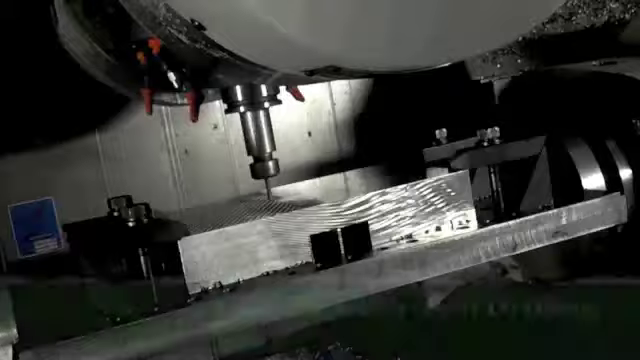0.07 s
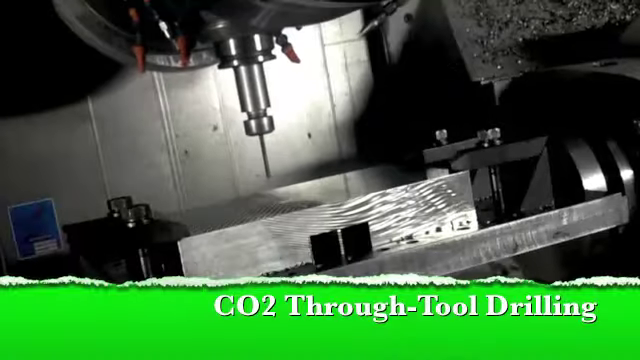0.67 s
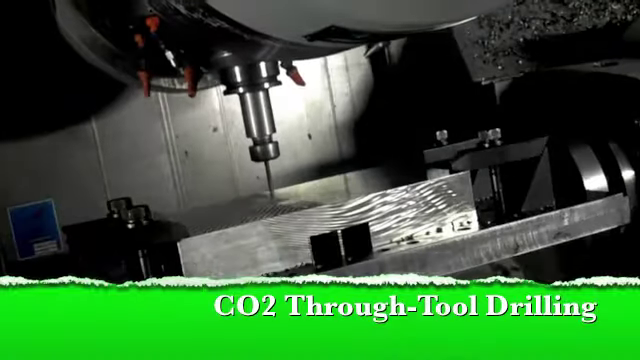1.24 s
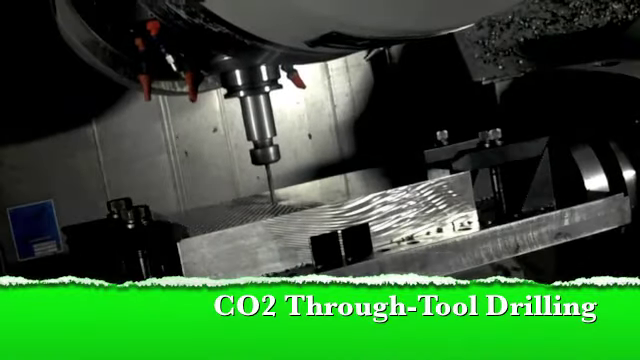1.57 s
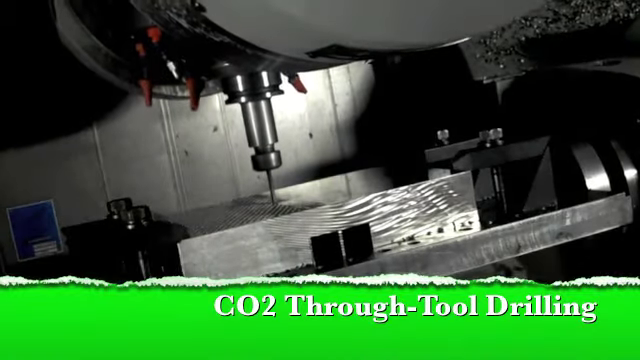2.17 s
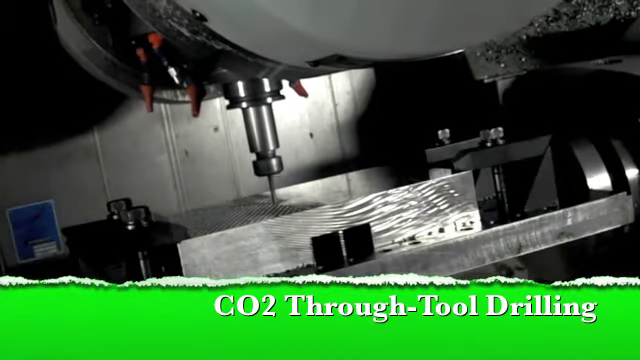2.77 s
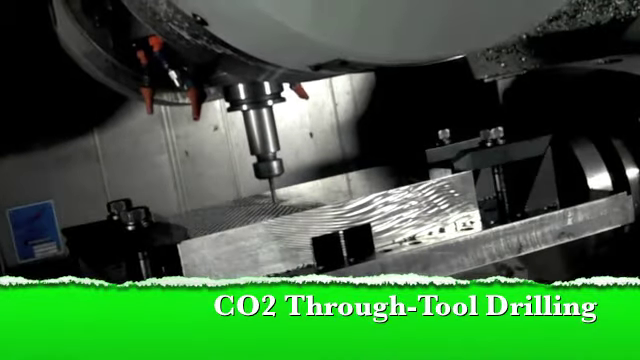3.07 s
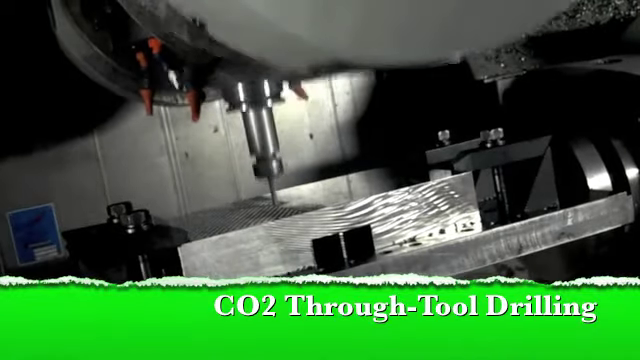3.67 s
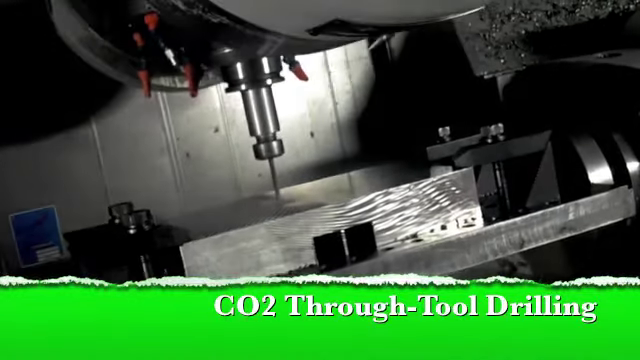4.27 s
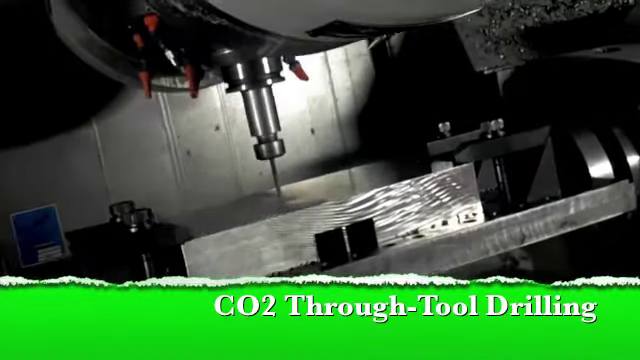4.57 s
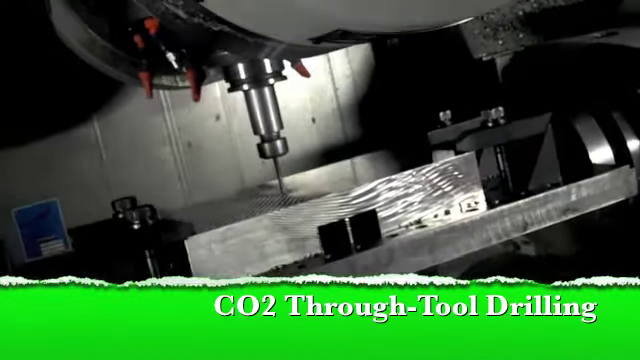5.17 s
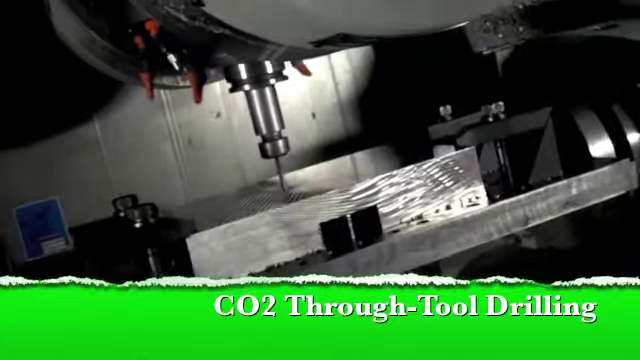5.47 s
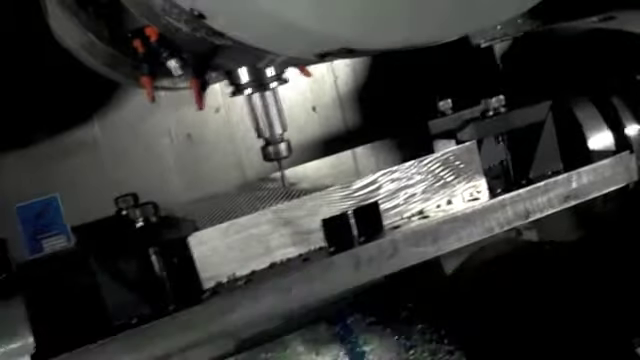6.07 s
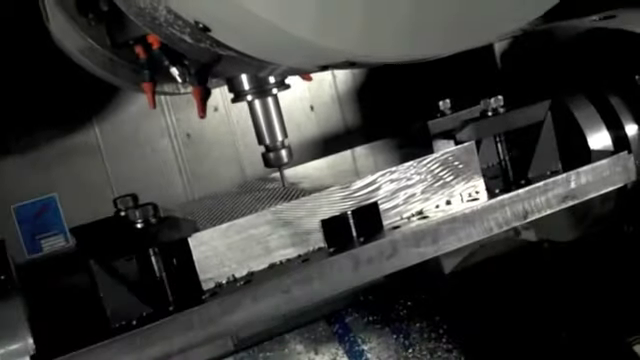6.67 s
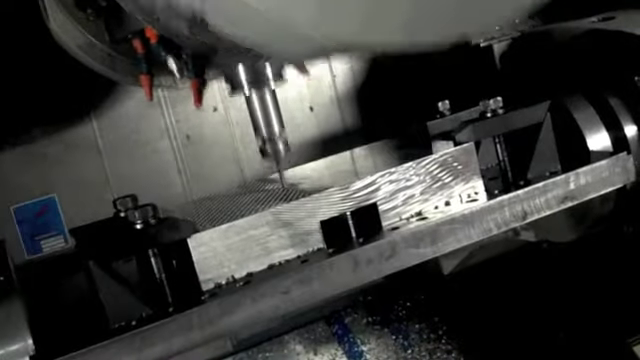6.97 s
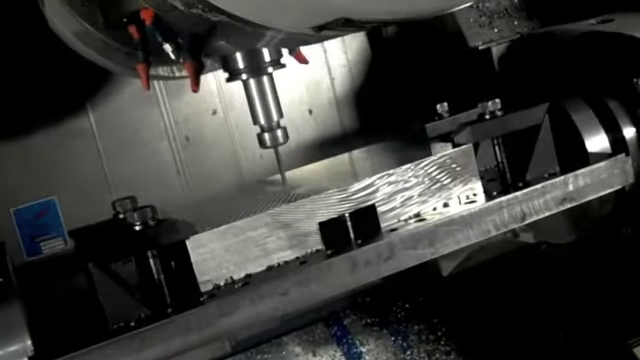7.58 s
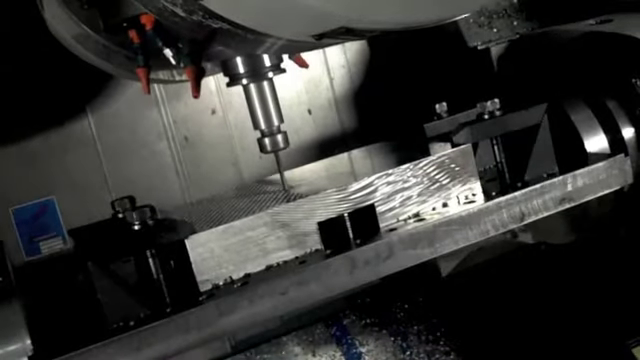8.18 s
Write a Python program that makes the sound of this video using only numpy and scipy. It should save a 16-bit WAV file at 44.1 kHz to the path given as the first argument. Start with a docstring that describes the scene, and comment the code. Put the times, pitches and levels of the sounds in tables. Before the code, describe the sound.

A loud gas hiss runs through a metal drill, broken three times by a pop, a high whistle and wind rumble.

```python
"""Gas hisses up the flutes of a small drill, over the rush of the cut and a faint spindle whine.
The place is a machining centre, where the drill bores a metal block with gas blown through it.
At each of three retracts the tip pops free; the jet buffets the microphones and whistles, ever more
narrowly, until the tip enters the next hole. The stereo pair stands within reach of the jet, the left
microphone a little nearer, and feeds a stereo widener."""
import sys
import numpy as np
from scipy import signal
from scipy.fft import rfft, irfft, next_fast_len
from scipy.io import wavfile

SR = 44100
rng = np.random.default_rng(int(sys.argv[2]) if len(sys.argv) > 2 else 0)


def wav_out(sig):
    """Save sig, one row per channel (or a flat mono array), as 16-bit PCM at SR to the path in sys.argv[1]."""
    wavfile.write(sys.argv[1], SR, np.round(np.clip(np.atleast_2d(sig).T, -1, 1) * 32767).astype(np.int16))


N = 370881
TIME = np.arange(N) / SR

# spectra of the gas in the flutes, the cut and the wind on the microphones: f/Hz, density/dB
HISS_SPECTRUM = [(100, -11.5), (500, -17), (1500, -8), (2200, 4.5), (3000, -4.5), (4400, 0.16), (5200, -4),
                 (6400, 5.5), (8200, -7), (9600, 1.5), (11500, -6), (14000, -6), (15500, -7.5)]
CUT_SPECTRUM = [(30, -22), (90, -40), (125, -13), (175, -1), (320, 2), (420, -4), (700, -3.5), (1000, -5),
                (1250, -3), (1450, -3), (1900, -1.5), (2500, -8), (3200, -4.5), (6000, -14.5),
                (15000, -13.5)]
BUFFET_SPECTRUM = [(25, 2), (65, -3), (90, -5), (125, -0.5), (180, 1), (250, -1), (400, -2.5), (600, -8.5),
                   (1000, -15), (2000, -28), (5000, -52)]
# how alike the two microphones hear turbulence: f/Hz, likeness/0-1
MIC_LIKENESS = [(100, 0.89), (400, 0.79), (900, 0.89), (2000, 0), (5000, 0.04), (15000, 0)]
# resonances that colour the hiss in the hole: f/Hz, width/Hz, level/dB against the hiss
HISS_RESONANCES = [(3687, 300, -17), (4436, 260, -21.5), (3580, 12, -26.5)]
# brief swells of the rush: t/s, level/dB, half-length/s
RUSH_SURGES = [(0.255, -28.5, 0.037), (2.8, -35.5, 0.11), (3.613, -32, .025), (5.87, -44, .13),
               (6.48, -44, .06)]
# brief dips of the rush: t/s, gain/dB, half-length/s
RUSH_LULLS = [(0.503, -1, .04), (3.553, -7, 0.028), (6.92, 0, .025)]
# partials of the spindle whine: f/Hz, level/dB, share of the swell/0-1, lag at the right microphone/s
WHINE_PARTIALS = [(1753.5, -3, 1, .00009), (1886, -2.5, .6, .00013)]
# hums of drives and panels: f/Hz, width/Hz, level/dB
MACHINE_HUMS = [(170, 14, -49), (258, 14, -51), (303, 20, -40.5), (393, 10, -55), (458, 8, -56),
                (604, 14, -49.5), (780, 20, -54), (845, 10, -52.3), (978, 7, -50.3), (1030, 25, -53),
                (1357, 12, -52), (1503, 10, -50.5), (1819, 26, -52), (2075, 14, -50.5), (2280, 34, -46)]
# the tip clears the hole: t/s, pop level/dB, pop f/Hz, pop decay/s, jet level/dB,
# whistle f/Hz once lowered, sealing by the next hole/(dB/s), buffet level/dB,
# squeak level/dB at the next touch, whine level/dB in the next hole
DRILL_RETRACTS = [(.582, -16, 1950, 0.012, -19.5, 7470, 129, -22.5, -29.5, -29),
                  (3.864, -19.5, 1900, 0.023, -19.5, 7210, 101, -24, -34, -32),
                  (7.122, -26, 1886, 0.026, -19, 7385, 106, -23, -31, -34.5)]
# standing waves between the work and the walls: f/Hz, level/dB
WALL_WAVES = [(6971, 3), (7107, 0), (7215, -9), (7350, -5), (7492, -2), (7607, -5), (7790, -13)]
# modes of the fresh hole: f/Hz, level/dB
FRESH_HOLE_MODES = [(1820, -1), (1948, 0), (2070, -4)]
# the strongest gusts on the microphones: t/s, level/dB, f/Hz
JET_GUSTS = [(.609, -22, 150), (.655, -14.5, 185), (.668, -19, 240), (.686, -18, 280), (.694, -22, 430),
             (.703, -19, 190), (.753, -22, 170), (.795, -18, 160), (.835, -22, 125), (.873, -21, 260),
             (.886, -22, 230), (.904, -19.5, 240), (.944, -19, 150), (1.338, -28, 170), (1.381, -27, 270),
             (3.924, -22, 220), (3.932, -21, 450), (3.996, -20, 230), (4.047, -19, 320), (4.165, -21, 200),
             (4.2, -24, 400), (4.248, -20.5, 190), (4.658, -25, 280), (7.137, -24, 300), (7.184, -22, 450),
             (7.227, -22, 170), (7.25, -19.5, 250), (7.318, -21, 200), (7.385, -23, 170), (7.475, -22, 210),
             (7.955, -27, 200)]
# brief flares of the whistle: t/s, level/dB, f/Hz
WHISTLE_FLARES = [(1.303, -14, 7480), (7.841, -11.5, 7420), (7.88, -14, 7560)]
# rings of the tool or the block: t/s, level/dB, f/Hz, half-length/s
METAL_RINGS = [(2.68, -43, 1465, 0.16), (6.6, -39, 1600, 0.1), (5.82, -39, 1375, 0.12),
               (6.48, -36.5, 1000, 0.068)]

# the stroke, timed by its age from a retract: pulled up, held high, lowered, fed until it touches
CYCLE_S, PULL_S, HIGH_S, LOWER_S, TOUCH_S = 3.27, .2, .36, .12, .87
# the free jet opens fast and starts with a blast of stored pressure
OPEN_S, OPEN_DB_PER_S, BLAST_S = .021, 328, .09


def from_db(db):
    """Decibels to amplitude."""
    return 10 ** (np.asarray(db) / 20)


def rms_one(x):
    """The signal scaled to rms 1."""
    return x / np.sqrt(np.mean(np.abs(x) ** 2) + 1e-20)


def ramp(age, start_s, length_s):
    """From 0 to 1 in a straight line."""
    return np.clip((age - start_s) / length_s, 0, 1)


def bump(offset, half_length):
    """A bell curve: 1 at offset 0, 1/e a half-length away."""
    return np.exp(-np.minimum((offset / half_length) ** 2, 50))


def at_hz(points, hz):
    """A spectrum read on a log-frequency axis."""
    freqs, values = np.array(points).T
    return np.interp(np.log(hz), np.log(freqs), values)


def drift(rate_hz):
    """A slow random wander of spread 1."""
    step, settle = 40, 2000
    pole = np.exp(-2 * np.pi * step * rate_hz / SR)
    white = rng.standard_normal(N // step + settle + 2)
    slow = signal.lfilter([1], [1, -2 * pole, pole * pole], white)[settle:]
    return np.interp(np.arange(N) / step, np.arange(len(slow)), rms_one(slow))


def from_left(x, lag_s):
    """A compact source reaches the right microphone a moment later."""
    return np.array([x, np.interp(TIME - lag_s, TIME, x)])


def turbulence(spectrum, flicker_db, flicker_hz, likeness=1):
    """Stereo noise in third-octave bands, each flickering on its own; rms 1."""
    out, edges = 0, 25 * 2 ** (np.arange(29) / 3)
    white = rng.standard_normal((2, 2, N))   # neighbouring bands get unrelated noise
    for k, (low, high) in enumerate(zip(edges, edges[1:])):
        band = signal.butter(2, [low, high], "band", fs=SR, output="sos")
        mid, side = signal.sosfilt(band, white[k % 2])
        hz = np.sqrt(low * high)
        alike = np.clip(likeness * at_hz(MIC_LIKENESS, hz), -1, 1)
        gain = from_db(at_hz(spectrum, hz) + flicker_db * drift(flicker_hz))
        out += gain * (np.sqrt(1 + alike) * mid + np.sqrt(1 - alike) * side * [[1], [-1]])
    return rms_one(out)


def resonance(hz, width_hz, steady=0, channels=2):
    """A noise-driven tone that wanders as fast as it is wide; steady (0-1) evens its strength; rms 1."""
    white = rng.standard_normal((channels, N // 2)) + 1j * rng.standard_normal((channels, N // 2))
    wander = signal.lfilter(*signal.butter(2, 1 / 8), white)
    wander = rms_one(wander / np.abs(wander) ** steady)
    read_at = 100 + np.cumsum(8 * width_hz * np.ones(N)) / SR
    carrier = np.exp(2j * np.pi * np.cumsum(hz * np.ones(N)) / SR)
    return np.sqrt(2) * np.array([(np.interp(read_at, np.arange(N // 2), w) * carrier).real
                                  for w in wander])


def current_retract():
    """At every sample: age/s of the retract (negative during the pull), then its other columns."""
    rows = np.array(DRILL_RETRACTS)
    latest = np.searchsorted(rows[:, 0] - PULL_S, TIME) - 1
    t, *columns = rows[np.maximum(latest, 0)].T
    return [TIME - t + CYCLE_S * (latest < 0), *columns]


def jet_stroke(age):
    """The drill in the open: lowered/0-1, gap closed/0-1, opening blast/0-1, freedom of the gas/dB."""
    landed_s = HIGH_S + LOWER_S
    blast = np.exp(-np.maximum(age, 0) / BLAST_S)
    free_db = OPEN_DB_PER_S * np.minimum(age - OPEN_S, 0)
    return ramp(age, HIGH_S, LOWER_S), ramp(age, landed_s, TOUCH_S - landed_s), blast, free_db


def cut_stroke(age, bite_s, lead_s=0):
    """The drill in the metal: load/0-1, depth/0-1."""
    start_s = TOUCH_S - lead_s
    load = ramp(age, start_s, bite_s) + 1 - ramp(age, 0, BLAST_S)
    depth = ramp((age - start_s) % CYCLE_S, 0, CYCLE_S - start_s)
    return load, depth


def flute_hiss(age):
    """Gas squeezes past the chips with a slight flutter; the hiss builds as the flutes fill."""
    empty_db, full_db, fill_delay_s, fill_s = -28, -21.5, .17, .71
    lowered, *_ = jet_stroke(age)
    empty = lowered * np.exp(-np.maximum(age - TOUCH_S - fill_delay_s, 0) / fill_s)
    level_db = full_db + (empty_db - full_db) * empty
    flutter_db = .5 * drift(14)
    hiss = turbulence(HISS_SPECTRUM, flicker_db=.4, flicker_hz=10)
    modes = sum(from_db(db) * resonance(hz, width_hz) for hz, width_hz, db in HISS_RESONANCES)
    return from_db(level_db + flutter_db) * (hiss + modes)


def rush(age):
    """The duller rush of the idling machine, the high jet and the cut, muffled deep in the hole."""
    idle_db, jet_db, blast_db, cut_db, muffled_db = -36, -35, 11.5, -28, 9
    lowered, _, blast, free_db = jet_stroke(age)
    load, depth = cut_stroke(age, bite_s=.27)
    jet = (1 - lowered) * from_db(jet_db + free_db + blast_db * blast)
    cut = load * from_db(cut_db - muffled_db * depth ** 3.6)
    surges = sum(from_db(db) * bump(TIME - t, half_s) for t, db, half_s in RUSH_SURGES)
    level = np.sqrt(from_db(idle_db) ** 2 + jet ** 2 + cut ** 2 + surges ** 2)
    lull_db = sum(db * bump(TIME - t, half_s) for t, db, half_s in RUSH_LULLS)
    return level * from_db(lull_db) * turbulence(CUT_SPECTRUM, flicker_db=1.7, flicker_hz=12)


def spindle(age, loaded_db):
    """Two wavering drive tones swell just before the tip touches; the hums ease between cuts."""
    idle_db, hum_ease_db, waver_hz = -40.5, -4, .886
    load, depth = cut_stroke(age, bite_s=.05, lead_s=.059)
    off_peak_db = 28 * (depth - .32) ** 2   # the whine is strongest a third of the way down
    swell = np.hypot(1, load * from_db(loaded_db - idle_db - off_peak_db))
    hums = sum(from_db(db) * resonance(hz, width_hz, channels=1)[0] for hz, width_hz, db in MACHINE_HUMS)
    out = from_left(from_db(hum_ease_db * (1 - load)) * hums, lag_s=.00005)
    for hz, db, share, lag_s in WHINE_PARTIALS:
        phase = 2 * np.pi * np.cumsum(hz + waver_hz * drift(3.5)) / SR
        out += from_left(from_db(idle_db + db) * swell ** share * np.sin(phase), lag_s)
    return out


def enclosure(x, t60, wet_db):
    """Echoes off the steel walls leave close peaks in noise; long waves reach both microphones alike."""
    size = next_fast_len(N + SR // 2)
    hz = np.arange(size // 2 + 1) * SR / size
    delay_s = np.arange(SR // 4) / SR
    echoes = rng.standard_normal((2, len(delay_s))) * from_db(-60 * delay_s / t60) * (delay_s > .003)
    mid, side = rfft(echoes / np.sqrt(np.sum(echoes ** 2, axis=1, keepdims=True)), size)
    alike = 1 / (1 + (hz / 1300) ** 2)
    walls = np.sqrt((1 + alike) / 2) * mid + np.sqrt((1 - alike) / 2) * side * [[1], [-1]]
    wet = from_db(wet_db) / np.sqrt(1 + (hz / 8000) ** 2)
    return irfft(rfft(x, size) * (1 + wet * walls) / np.sqrt(1 + wet ** 2), size)[:, :N]


def spray(age, jet_db):
    """Broad hiss escapes during the pull, spurts with the blast and fades as the drill comes down."""
    _, _, blast, _ = jet_stroke(age)
    opening_db = 41 * np.minimum(age - OPEN_S, 0)
    spurt_db = 10.5 * blast * ramp(age, -OPEN_S, OPEN_S)
    fade = 1 - ramp(age, HIGH_S, length_s=.24)
    return fade * from_db(jet_db - 11 + opening_db + spurt_db) * resonance(11000, width_hz=5200)


def pops():
    """Trapped gas bursts out with a crack and leaves the fresh hole ringing."""
    rise_s, ring_db, ring_decay_s = .0044, -30.5, .11
    modes = sum(from_db(db) * resonance(hz, width_hz=45, channels=1)[0] for hz, db in FRESH_HOLE_MODES)
    out = 0
    for t, db, hz, decay_s, *_ in DRILL_RETRACTS:
        rise = np.exp(np.minimum(TIME - t, 0) / rise_s)
        after = np.maximum(TIME - t, 0)
        crack = from_db(db) * np.exp(-after / decay_s) * resonance(hz, 300, steady=.4, channels=1)[0]
        ring = from_db(ring_db) * np.exp(-after / ring_decay_s) * modes
        out += rise * (crack + ring)
    return from_left(out, lag_s=.00007)


def free_jet(age, jet_db, landing_hz, seal_db_per_s, squeak_db):
    """The jet whistles broadly when high; near the work it narrows, then climbs as the gap closes."""
    high_hz, blast_sag_hz, touch_hz, upper_hz = 7945, 594, 7683, 12300
    blast_db, near_db, closing_db = 2, 3.5, 2.5
    lowered, closed, blast, free_db = jet_stroke(age)
    high = 1 - lowered
    sealed_db = seal_db_per_s * np.maximum(age - TOUCH_S, 0)
    boost_db = blast_db * blast + near_db * lowered ** 2 + closing_db * closed
    level = from_db(jet_db + free_db - sealed_db + boost_db)
    near_hz = landing_hz + (touch_hz - landing_hz) * closed
    hz = high * (high_hz - blast_sag_hz * blast) + lowered * near_hz
    edge_tone = resonance(hz, width_hz=1000 * high + 470 * lowered, steady=.61)
    whistle = standing_waves(edge_tone, width_hz=17.6, between_db=-1.5)
    skirt = from_db(-4 * high - 17 * lowered) * resonance(hz, width_hz=2600 * high + 1500 * lowered)
    # a hollow tone, held back by the blast, climbs as the tip leaves the hole
    hollow_hz = 2390 - 240 * np.exp(-np.maximum(age, 0) / .12)
    hollow = from_db(-4 * high - 15 * lowered - 3 * blast) * resonance(hollow_hz, width_hz=560)
    # a faint upper whistle sizzles, and squeaks as the tip touches
    sizzle = from_db(-14.5 * high - 18 * lowered) * resonance(upper_hz, width_hz=2800 - 1100 * high)
    squeak = from_db(squeak_db) * bump(age - TOUCH_S, .053) * resonance(upper_hz, width_hz=560)
    return level * (whistle + skirt + hollow + sizzle) + squeak


def standing_waves(x, width_hz, between_db):
    """The whistle stands out wherever its pitch crosses a standing wave between work and walls."""
    peaks = sum(from_db(db) * signal.lfilter(*signal.iirpeak(hz, hz / width_hz, fs=SR), x)
                for hz, db in WALL_WAVES)
    return from_db(between_db) * x + peaks


def buffeting(age, rumble_db):
    """The spreading jet hits the microphones as a low, lumpy rumble that stops when the tip touches."""
    rise_s, drop_s, stop_s, sag_db_per_s, drop_db = .047, .06, .06, 14, 9.5
    _, closed, *_ = jet_stroke(age)
    blowing = ramp(age, 0, rise_s) * ramp(-age, -TOUCH_S - stop_s / 4, stop_s)
    # it sags after the blast, drops as the drill is lowered and returns as the gap closes
    stroke_db = drop_db * (closed - ramp(age, .38, drop_s)) - sag_db_per_s * np.clip(age, 0, HIGH_S)
    rumble = turbulence(BUFFET_SPECTRUM, flicker_db=2.5, flicker_hz=22, likeness=.1)
    lumps_db = 1.8 * drift(23)
    return blowing * from_db(rumble_db + stroke_db + lumps_db) * rumble


def gusts(cycles):
    """Each eddy knocks for a few cycles, pushing on one microphone as it pulls on the other."""
    out = 0
    for (t, db, hz), start_turn in zip(JET_GUSTS, rng.random(len(JET_GUSTS))):
        turns = hz * (TIME - t)
        out += from_db(db) * bump(turns, cycles) * np.cos(2 * np.pi * (turns + start_turn))
    return out * np.array([[1.5], [-.2]])


def flares(half_s):
    """The whistle locks on to one pitch for an instant."""
    tones = sum(from_db(db) * bump(TIME - t, half_s) * np.sin(2 * np.pi * hz * TIME)
                for t, db, hz in WHISTLE_FLARES)
    return from_left(tones, lag_s=.00003)


def cut_rings(width_hz):
    """The cut sets the tool or the block ringing for a moment."""
    rings = sum(from_db(db) * bump(TIME - t, half_s) * resonance(hz, width_hz, channels=1)[0]
                for t, db, hz, half_s in METAL_RINGS)
    return from_left(rings, lag_s=.00005)


def scene():
    """The drill repeats its stroke inside the enclosure, nearer the left microphone."""
    age, *_, jet_db, landing_hz, seal_db_per_s, rumble_db, squeak_db, whine_db = current_retract()
    drilling = flute_hiss(age) + rush(age)
    jet = spray(age, jet_db) + free_jet(age, jet_db, landing_hz, seal_db_per_s, squeak_db)
    enclosed = enclosure(drilling + jet, t60=.25, wet_db=-8.5)
    blasts = buffeting(age, rumble_db) + gusts(cycles=1.8) + pops()
    tones = flares(half_s=.0049) + cut_rings(width_hz=90) + spindle(age, whine_db)
    lean_db = 1.5
    return (enclosed + blasts + tones) * from_db([[lean_db], [-lean_db]])


def record(dry):
    """A widener combs the pair with a short delay, deepest in the centre; fade-in and top cut follow."""
    lag_samples, side_cross, centre_lean_db, cutoff_hz = 16, 1.22, -.9, 15700
    mid, side = (dry[0] + dry[1]) / 2, (dry[0] - dry[1]) / 2
    late_mid, late_side = np.pad([mid, side], ((0, 0), (lag_samples, 0)))[:, :N]
    centre = (mid - late_mid) / np.sqrt(2) * from_db([[centre_lean_db], [-centre_lean_db]])
    sides = (side + side_cross * late_side) / np.hypot(1, side_cross) * [[1], [-1]]
    fade = np.interp(TIME, [.122, .222], [0, 1])
    top_cut = signal.ellip(12, .1, 80, cutoff_hz, fs=SR, output="sos")
    return signal.sosfilt(top_cut, (centre + sides) * fade)


dry = scene()
out = record(dry)
wav_out(out)
```